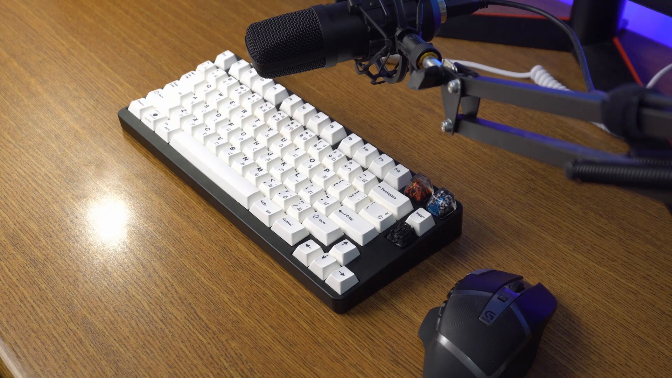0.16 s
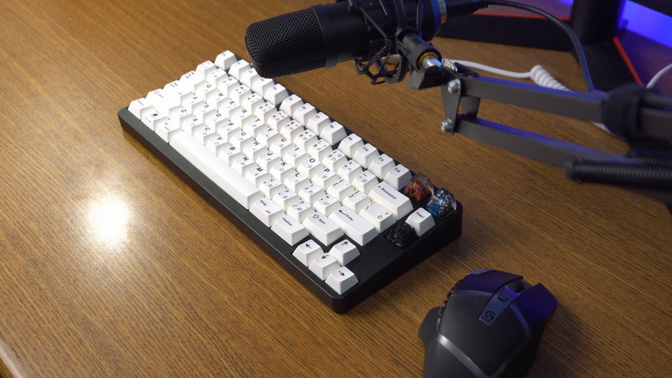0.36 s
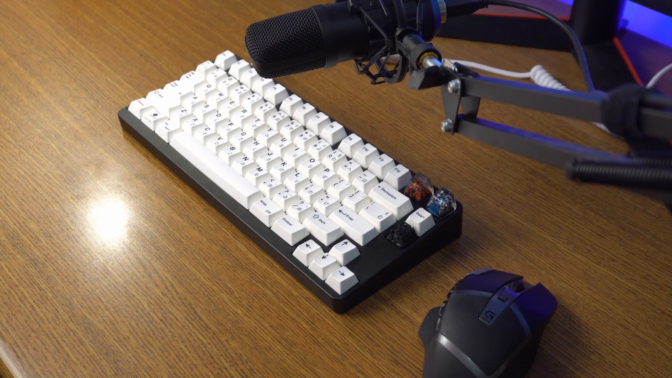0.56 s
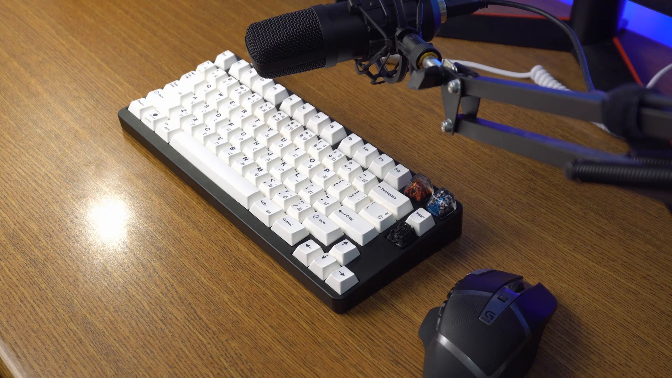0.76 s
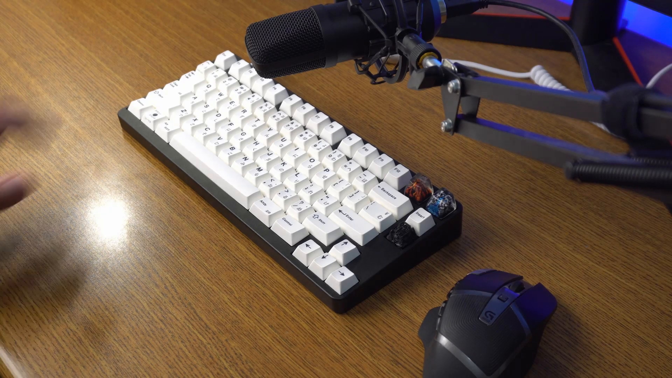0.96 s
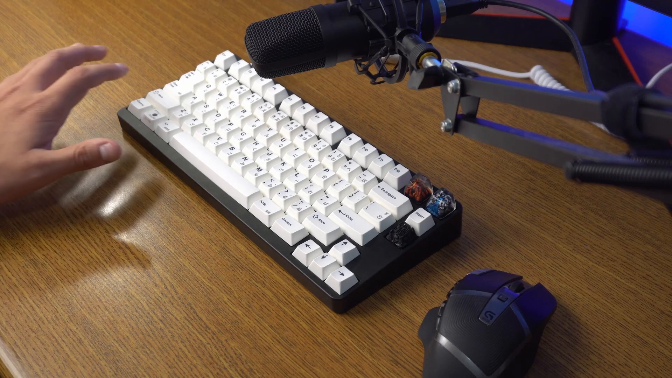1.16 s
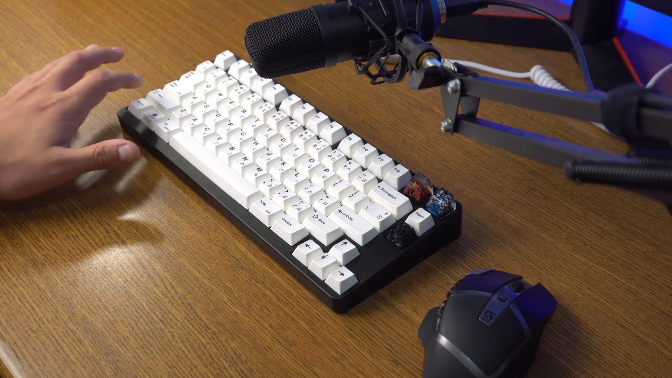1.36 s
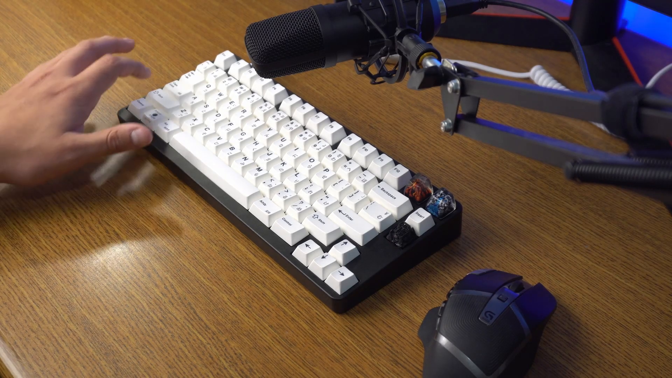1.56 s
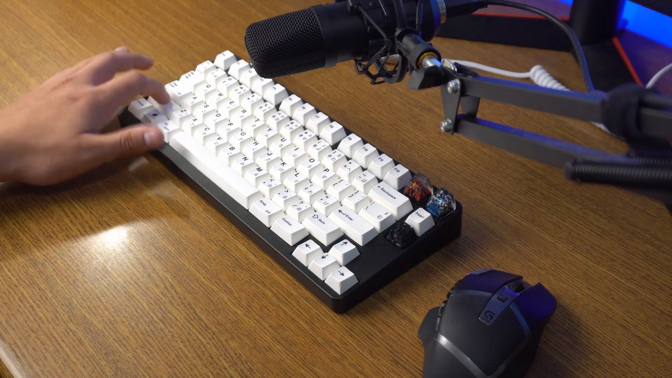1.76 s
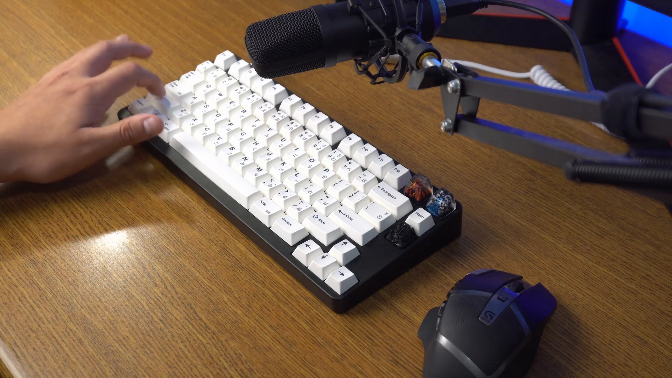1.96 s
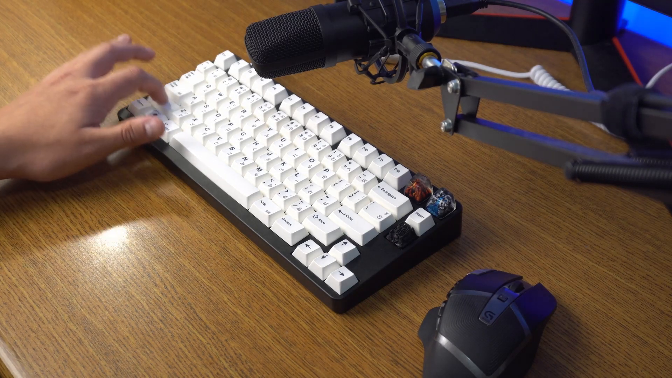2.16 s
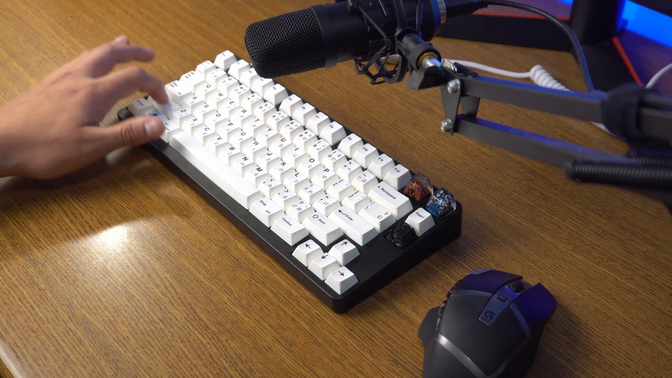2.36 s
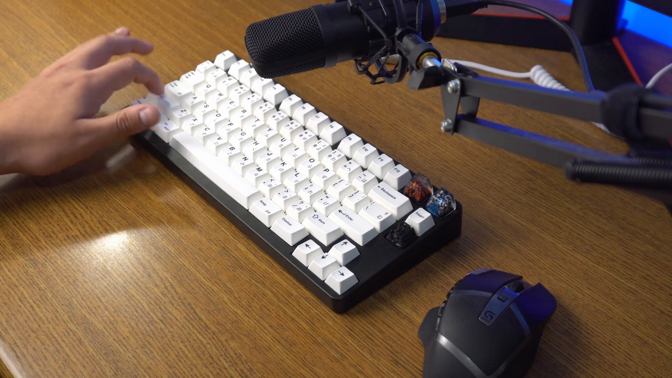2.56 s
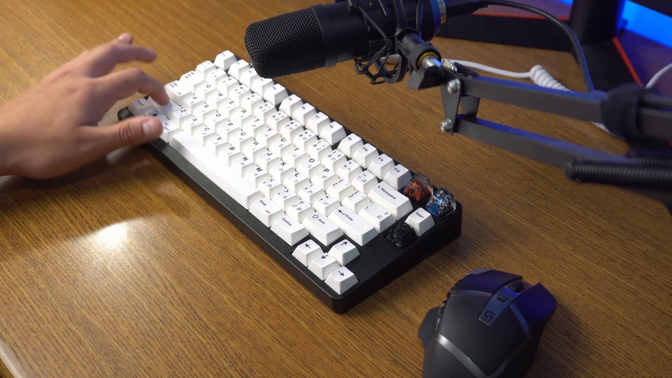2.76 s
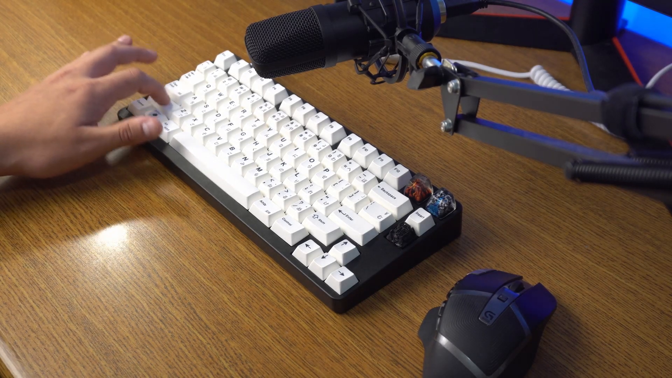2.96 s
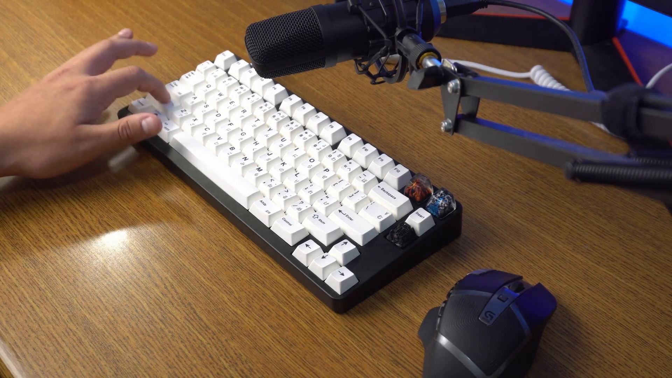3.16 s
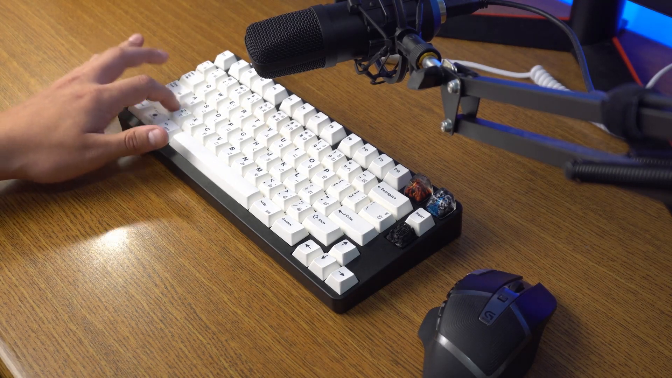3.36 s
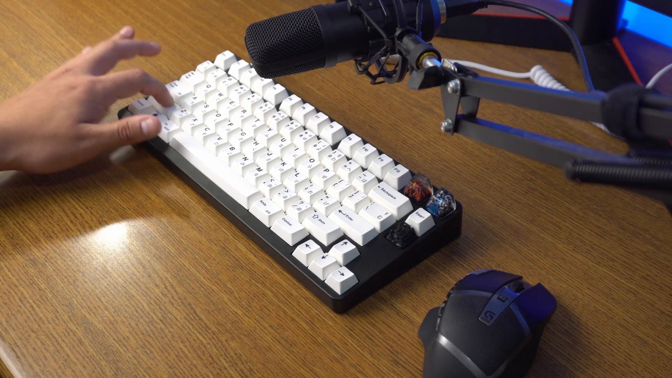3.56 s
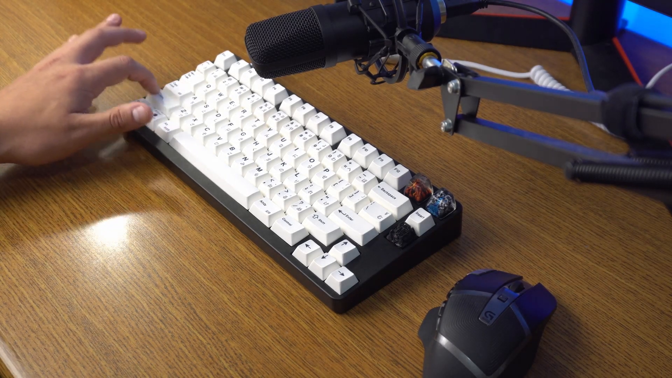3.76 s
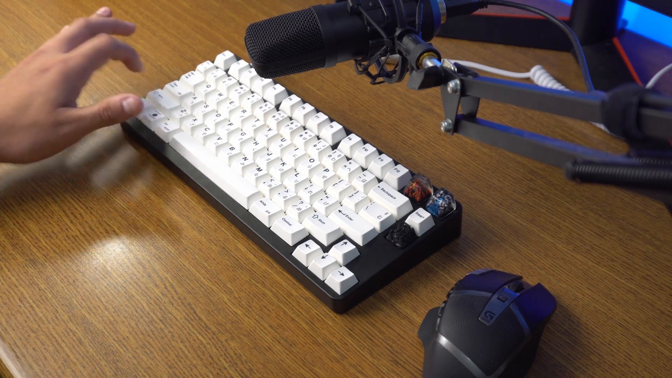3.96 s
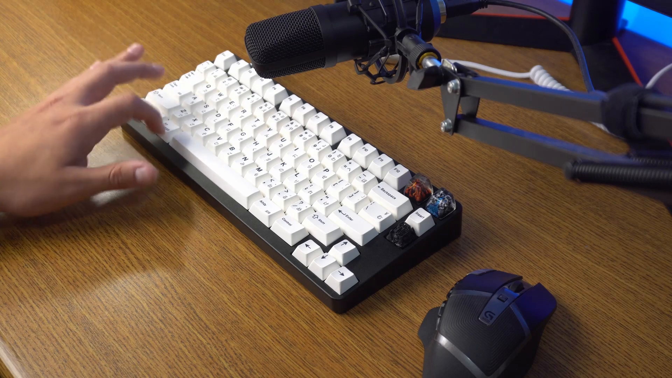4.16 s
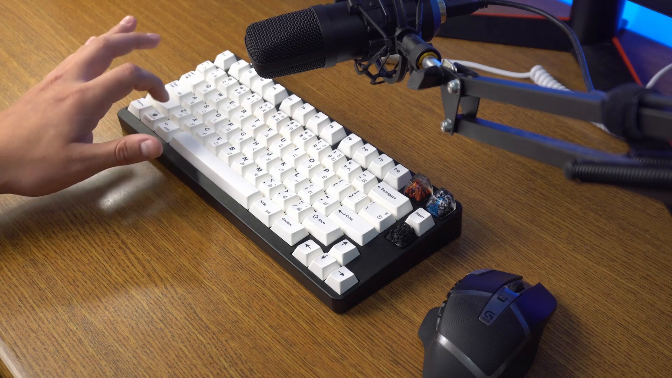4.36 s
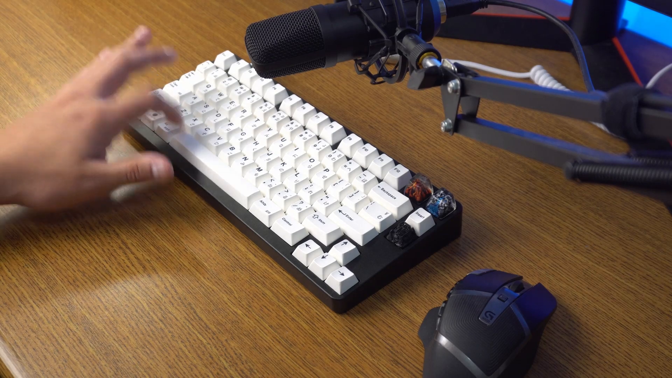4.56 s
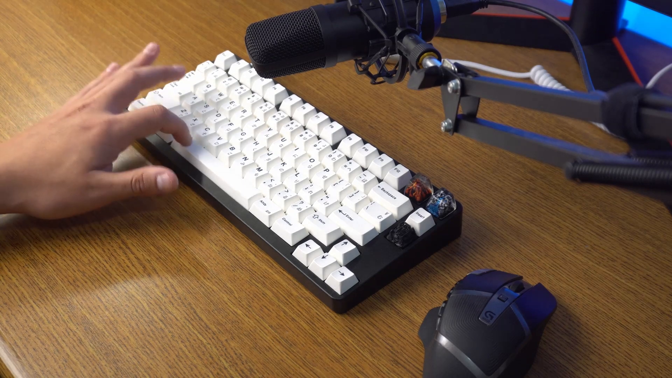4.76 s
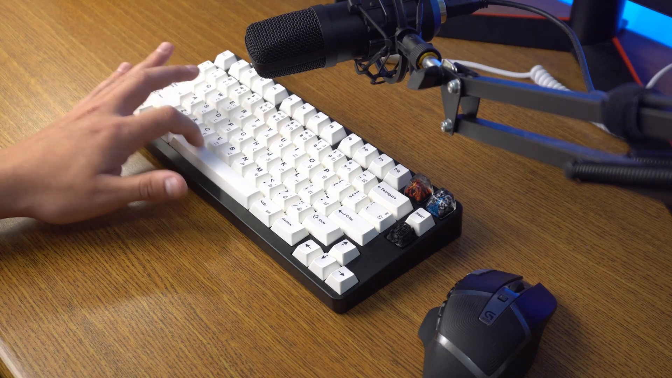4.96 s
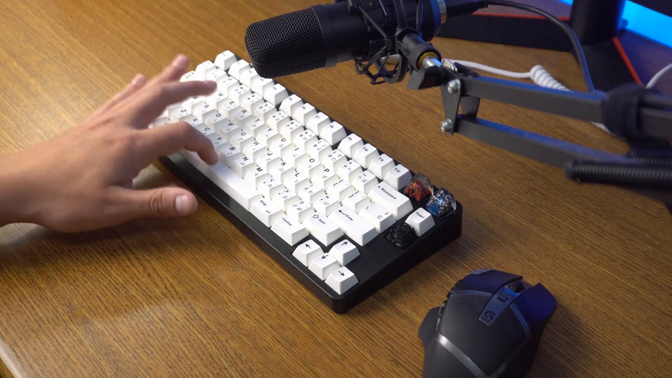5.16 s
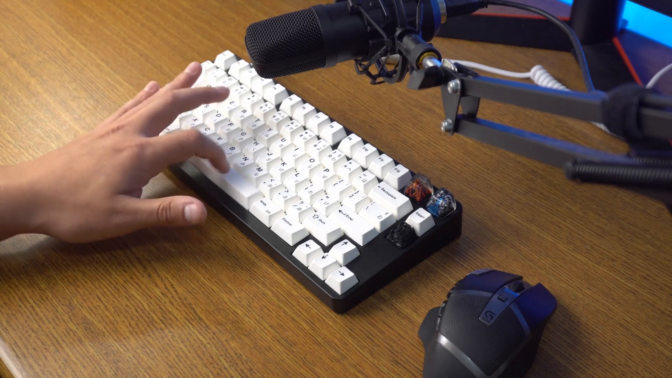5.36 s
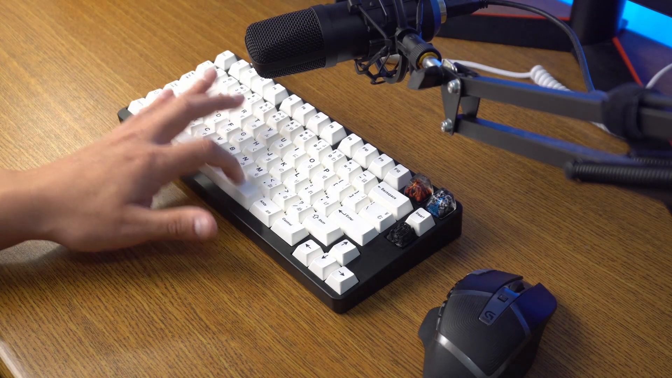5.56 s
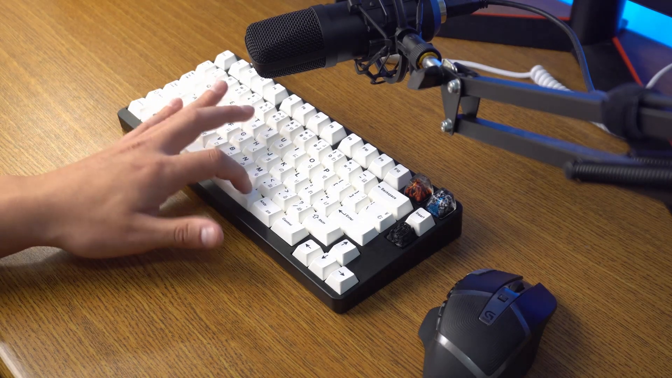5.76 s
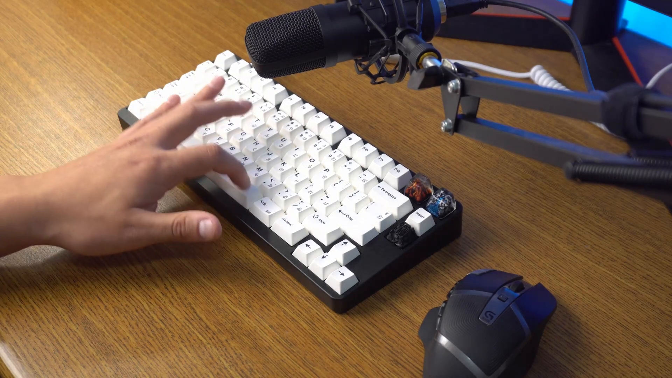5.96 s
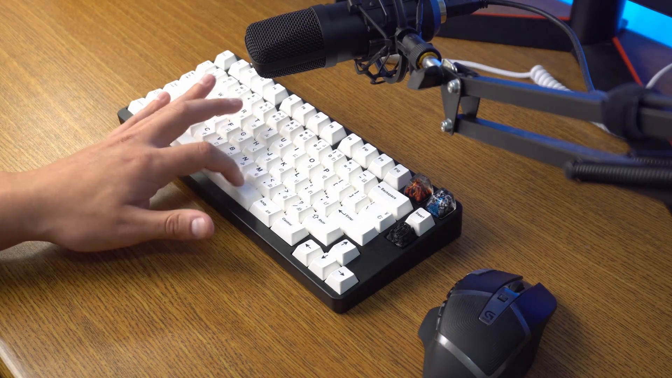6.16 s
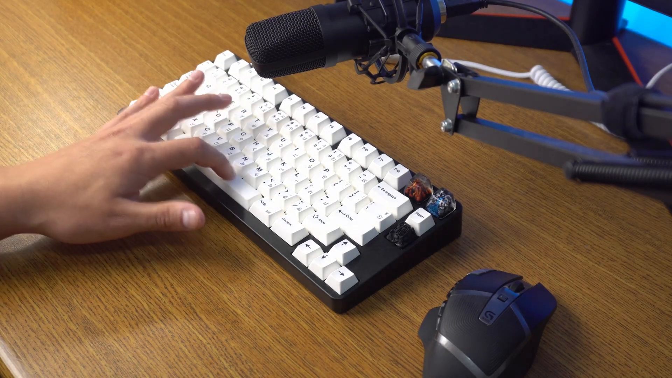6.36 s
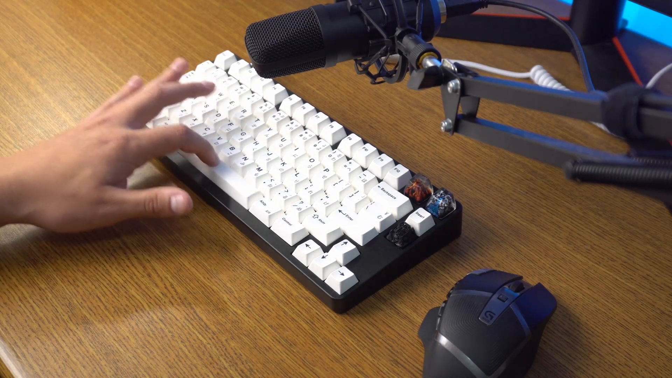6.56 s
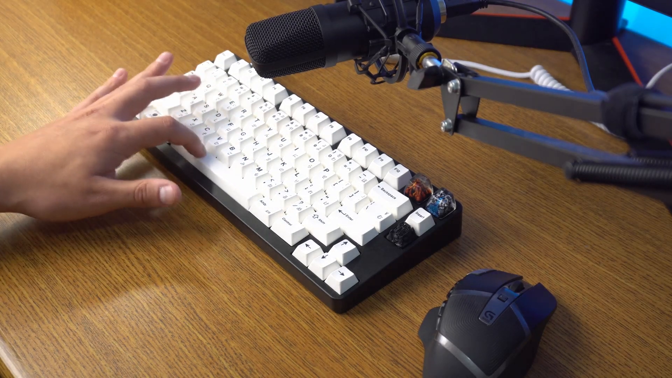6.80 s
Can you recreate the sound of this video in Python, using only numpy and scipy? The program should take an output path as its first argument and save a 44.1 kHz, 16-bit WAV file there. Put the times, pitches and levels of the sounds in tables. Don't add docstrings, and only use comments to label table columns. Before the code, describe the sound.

Close, crisp mechanical key presses in two even runs of fifteen, each clack followed by a softer release tick, over faint computer hum.

```python
import sys
import numpy as np
from scipy import signal
from scipy.fft import rfft, irfft, next_fast_len
from scipy.io import wavfile
from scipy.ndimage import uniform_filter1d

SR = 44100
rng = np.random.default_rng(int(sys.argv[2]) if len(sys.argv) > 2 else 0)


def boost_factor(decibels):
    exponent = np.asarray(decibels, float) / 20
    return 10 ** exponent


def generate_wav(signal):
    frames = np.transpose(np.atleast_2d(signal))
    scaled = np.clip(frames, -1, 1) * 32767
    pcm = np.round(scaled).astype(np.int16)
    wavfile.write(sys.argv[1], SR, pcm)


N = 301203
MOVE_S = 4.3

# t/s, cap peak level/dB,
# then stem knock, case ring, thock level/dB re cap
BOTTOM_OUTS = [(1.8042, -18.5, 0.5, -7.5, -15), (1.9544, -25.5, -3.5, -10.5, -29),
               (2.0952, -27.5, 2.5, -8.5, -34), (2.238, -25, -1, -6.5, -16), (2.385, -25, -1.5, -7, -29),
               (2.5351, -25, -1, -7.5, -15), (2.6927, -24, 0, -7.5, -21), (2.829, -25.5, -1, -2.5, -5),
               (2.9976, -24, 4, -8.5, -23), (3.1383, -29.5, 3.5, -0.5, -0.5),
               (3.2916, -32.5, 7.5, 2.5, -1), (3.4281, -24.5, 0.5, -8.5, -19), (3.5895, -23, 5, -10, -8),
               (3.7569, -25.5, -15, -14, -15.5), (3.8902, -24.5, -4, -24, -9.5),
               (4.663, -20.5, -1, -4, -10.5), (4.801, -24, -2, -2, -8.5), (4.9442, -22, 1, -6.5, -6.5),
                  (5.0846, -20.5, -4, -5.5, -10), (5.232, -15, 3.5, -18, -11.5),
                  (5.3769, -21.5, 0.5, -9, -7), (5.5192, -19.5, -10, -8, -9), (5.6747, -21, -11, -6, -10),
                  (5.8154, -21, -7, -5, -9), (5.9661, -21.5, -16, -5, -15.5),
                  (6.1129, -21.5, -7.5, -4, -11.5), (6.2594, -22.5, -11, -5, -10.5),
                  (6.4038, -24.5, -11, -4, -8), (6.5539, -23, -1, -6.5, -7.5), (6.6956, -26, 0.5, -5, -7)]
STRIKES = BOTTOM_OUTS


def evened(x):
    return x / np.sqrt(np.mean(x ** 2) + 1e-20)


def peaked(x):
    return x / (abs(x).max() + 1e-20)


def read(points, hz):
    f, value = np.transpose(points)
    return np.interp(np.log(hz + 1), np.log(f + 1), value)


def envelope(rows):
    t, db = np.transpose(rows)
    return boost_factor(np.interp(np.arange(N) / SR, t, db, -200, -200))


def add(mix, s, sound):
    part = mix[round(s * SR):][:len(sound)]
    part += sound[:len(part)]


def noise(tone):
    size = next_fast_len(N)
    hz = np.fft.rfftfreq(size, 1 / SR)
    spectrum = rfft(rng.standard_normal(size)) * boost_factor(read(tone, hz))
    return evened(irfft(spectrum, size)[:N])


def resonate(x, hz, width_hz):
    return signal.lfilter(*signal.iirpeak(hz, hz / width_hz, SR), x)


def ring(modes, t, spread, spread_db, rise_s):
    hz, db, t60 = np.transpose(modes)[:, :, None]
    level_luck, pitch_luck = rng.standard_normal((2, len(modes), 1))
    decay = boost_factor(db + spread_db * level_luck - 60 * t / t60)
    lines = decay * np.sin(2 * np.pi * hz * (1 + spread * pitch_luck) * t)
    return lines.sum(0) * (1 - np.exp(-t / rise_s)) ** 2


def fan_air():
    # f/Hz, level/dB
    air_tone = [(15, -0.5), (24, 9), (40, -29.5), (62, -2.5), (100, -17), (170, -18.5), (260, -19),
                (450, -22), (800, -31), (1500, -36.5), (2600, -41), (6000, -45), (15300, -45.5),
                (16000, -62)]
    swell = evened(uniform_filter1d(rng.standard_normal(N), 9000))
    return boost_factor(-57 + 0.4 * swell) * noise(air_tone)


def mains_hum():
    # f/Hz, rms level/dB
    harmonics = [(60.2, -66.5), (120.4, -66), (240.5, -74)]
    turn = 2 * np.pi * np.arange(N) / SR
    hum = np.zeros(N)
    for hz, db in harmonics:
        halo = evened(resonate(rng.standard_normal(N), hz, 6.5))
        hum += boost_factor(db) * (1.2 * np.sin(hz * turn) + 0.45 * halo)
    return hum


def soft_noises():
    # t/s, level/dB
    distant_swell = [
        (5.9, -66),
        (5.972, -49),
        (6.08, -61.5),
    ]
    # t/s, level/dB
    rustles = [
        [(0.0, -52.5), (0.004, -74), (0.05, -82)],
        [(0.68, -101), (0.736, -73), (0.95, -90)],
    ]
    dull = noise([(150, -22), (300, -13.5), (800, -15.5), (1500, -21.5), (4000, -56)])
    bright = noise([(800, 14), (2500, -15), (7000, -11), (12000, -12), (16000, -25)])
    return dull * envelope(distant_swell) + bright * sum(envelope(rows) for rows in rustles)


def activity(axis, rise_s, fade_s, landing_db, settle_s):
    # start t/s, end t/s, then rubbing, slow sway, quick sway level/dB
    runs = [
        (1.827, 4.0, -62.5, -48, -56),
        (4.67, 6.9, -62.5, -49, -57),
    ]
    t, out = np.arange(N) / SR, np.zeros(N)
    for run in runs:
        before = np.maximum(run[0] - t, 0)
        after = np.maximum(t - run[1], 0)
        edges_db = -20 * (before / rise_s + after / fade_s)
        overshoot_db = landing_db * np.exp(-np.maximum(t - run[0], 0) / settle_s)
        out += boost_factor(run[axis] + edges_db + overshoot_db)
    return out


def sway():
    slow = evened(resonate(resonate(rng.standard_normal(N), 22.6, 16), 22.6, 16))
    quick = evened(resonate(resonate(rng.standard_normal(N), 64, 30), 64, 30))
    kick_db, kick_s = 12, 0.03
    u, jolts = np.arange(SR // 4) / SR / kick_s, np.zeros(N)
    for s, *_ in STRIKES:
        add(jolts, s, u * np.exp(1 - u) * rng.uniform(0.55, 1))
    quick = resonate(quick, 66, 60.5) * boost_factor(kick_db * (jolts - 0.5))
    shape = dict(rise_s=0.064, fade_s=1, landing_db=7, settle_s=0.22)
    return slow * activity(3, **shape) + quick * activity(4, **shape)


def held():
    # f/Hz, level/dB
    fizz_tone = [(800, 0.5), (2000, 0.5), (4500, -4.5), (8000, -7), (13000, -12.5), (15700, -13.5),
                 (16000, -51)]
    hold_s = 0.072
    t, gain = np.arange(SR // 5) / SR, np.zeros(N)
    for s, db, *_ in STRIKES:
        add(gain, s, boost_factor(db - 40.5 - 6.7 * (t / hold_s) ** 2))
    return gain * noise(fizz_tone)


def rub():
    # f/Hz, level/dB
    rub_tone = [(700, -1.5), (1300, 0.5), (2000, -0.5), (3000, 1.5), (5000, -7), (9000, -14.5),
                (15600, -22), (16000, -46.5)]
    usual_db = (-22.5, -21)
    grain = boost_factor(1.4 * evened(uniform_filter1d(rng.standard_normal(N), 120)))
    s, db = np.transpose(STRIKES)[:2]
    excess_db = db - np.where(s > MOVE_S, usual_db[1], usual_db[0])
    force_db = np.interp(np.arange(N) / SR, s + 0.085, excess_db)
    gain = activity(2, rise_s=0.018, fade_s=0.15, landing_db=1, settle_s=0.15)
    return evened(noise(rub_tone) * grain) * gain * boost_factor(-3.5 + 0.54 * force_db)


def desk_shake(pushes):
    # f/Hz, level/dB, t60/s
    desk_modes = [(64.7, 7, 0.12), (25.2, -13.5, .2), (90.4, 3, .07), (150.4, -5, 0.013),
                  (216, 10.5, 0.039)]
    shake = ring(desk_modes, np.arange(SR // 3) / SR, spread=0, spread_db=0, rise_s=0.0018)
    return signal.oaconvolve(pushes, shake)[:N]


def room(x):
    # f/Hz, t60/s
    decay = [(300, 0.61), (1000, 0.22), (2000, 0.25), (4000, 0.24), (8000, 0.17), (15000, 0.21)]
    # f/Hz, level/dB
    tail_tone = [(300, -16), (800, -17), (1500, -12.5), (3000, -17.5), (6000, -11.5), (15300, -20.5),
                 (16200, -45.5)]
    out, turn = np.zeros(N), np.arange(N) / SR * 8.3
    for k in range(3):
        taps = np.zeros(SR // 3)
        at = np.arange(60, len(taps) - 20, 20)
        taps[at + rng.integers(0, 20, len(at))] = rng.choice([-1., 1.], len(at))
        hz, t, z = signal.stft(taps, SR, nperseg=128)
        late = boost_factor(-60 * t / np.maximum(read(decay, hz), 0.01)[:, None])
        scatter = boost_factor(7.5 - 60 * t / 0.032)
        shaped = z * boost_factor(read(tail_tone, hz))[:, None] * (late + scatter)
        tail = 0.13 * signal.istft(shaped, SR, nperseg=128)[1]
        share = np.cos(turn + k * np.pi / 3) * np.sqrt(2 / 3)
        out += signal.oaconvolve(x * share, tail)[:N]
    return out


def radiate(x):
    x = signal.sosfilt(signal.butter(4, 365, "hp", fs=SR, output="sos"), x)
    return x - 0.64 * resonate(x, 906, 290)


def crackle(x, top_db):
    # f/Hz, width f/Hz, level/dB
    humps = [(4410, 980, 5), (5210, 400, -8), (7200, 1800, -6.5), (9590, 3400, -4.5), (14100, 2700, 3.5)]
    x = resonate(resonate(x, 5260, 9360), 4950, 6000)
    for hz, width_hz, db in humps:
        dull_db = top_db * (hz > 9e3)
        x = x + boost_factor(db + dull_db + 0.89 * rng.standard_normal()) * resonate(x, hz, width_hz)
    return x


def contact(row, kind):
    # f/Hz, level/dB, t60/s
    cap_modes = [(2727, 2, 0.0092), (3058, -9.5, 0.024), (2430, -0.5, 0.0055), (3480, -20, 0.05)]
    stem_modes = [(1955, 1, 0.016), (2173, -1, 0.014), (1680, -17, 0.035)]
    case_modes = [
        [(1269, 12, 0.013), (1098, 1, 0.021), (1486, -21, 0.023)],
        [(1315, 4.5, 0.011), (1086, -7, 0.015), (1500, -68, 0.084)],
    ]
    thock_modes = [
        [(440, -0.5, 0.02), (530.4, -3.5, 0.026), (745, 0, 0.017)],
        [(436.5, -5.5, 0.028), (503, -5.5, 0.03), (678, -5.5, 0.019)],
    ]
    part_db = (3, -0.23, 0, -4, 0.63)
    s, cap_db, *rel_db = row
    db, fall_ms, rattle_db, rise_ms, shake_db, top_db = kind
    zone = int(s > MOVE_S)
    t = np.arange(1400) / SR
    bounces = rng.standard_normal(len(t)) * boost_factor(1.15 * rng.standard_normal(len(t)))
    rattle = bounces * boost_factor(-2e4 * t / fall_ms) * (1 - np.exp(-1e3 * t / rise_ms))
    rattle /= np.linalg.norm(rattle)
    drive = boost_factor(rattle_db) * rattle + (t == 0)
    sizzle = drive + 0.6 * rattle
    rings = [
        ring(cap_modes, t, 0.02, 1.7, rise_s=3e-5),
        ring(stem_modes, t, 0.02, 1.7, rise_s=3e-5),
        ring(case_modes[zone], t, 0.008, 1.3, rise_s=0.0075),
        ring(thock_modes[zone], t, 0.015, 1.5, rise_s=0.0022),
    ]
    rung = signal.fftconvolve(drive[None], rings, axes=1)[:, :len(t)]
    parts = [*rung, crackle(sizzle, top_db)]
    gains = boost_factor(cap_db + db + np.array([0, *rel_db]) + part_db)
    return -sum(g * peaked(p) for g, p in zip(gains, parts)), boost_factor(cap_db + shake_db)


def strikes():
    # level/dB, rattle 20 dB fall t/ms, rattle level/dB re click, rise t/ms,
    # desk shake level/dB, crack top level/dB
    kinds = [
        (1, 2.5, 1, 0.11, -28.5, -7),
        (1, 3.5, -3, 0.04, -30.5, 4),
    ]
    # level/dB, slope in dB per dB of stem
    cracks = [
        (2.5, 0.24),
        (0.75, 0.07),
    ]
    for s, db, stem_db, case_db, thock_db in STRIKES:
        crack_db, slope = cracks[s > MOVE_S]
        yield (s, db, stem_db, case_db, thock_db, crack_db + slope * stem_db), kinds[s > MOVE_S]


def touches():
    # t/s, cap peak level/dB, crack level/dB
    nail_touches = [(1.7978, -37.5, 12.5), (1.9352, -43, 11), (2.0759, -40.5, 7.5), (2.2199, -40.5, 6.5),
                    (2.3658, -41, 7), (2.5163, -40, 7.5), (2.678, -42, 9.5), (2.8056, -46.5, 2),
                    (2.9779, -43.5, 9.5), (3.1167, -44, 7.5), (3.2606, -48, 7), (3.4022, -45, 11),
                    (3.5684, -44, 8), (3.7298, -42, 2.5), (3.8692, -42.5, 2), (4.653, -32, 6.5),
                    (4.78, -57, 4), (4.9286, -43, 4), (5.0657, -42.5, 0), (5.2186, -44, 6.5),
                    (5.3586, -43, 4), (5.506, -49, -1), (5.6552, -47, -4), (5.797, -44, 0.5),
                    (5.941, -46.5, 3), (6.086, -50.5, 4), (6.2273, -56, 2), (6.3846, -54, -9),
                    (6.527, -51, -3), (6.6626, -51.5, 4)]
    kind = (-0.5, 7, 6.5, 0.3, -28, -7)
    # stem knock, case ring, thock level/dB
    colours = [
        (-4, -8.5, -24.5),
        (-9, -6, -21),
    ]
    for s, db, crack_db in nail_touches:
        yield (s, db, *colours[s > MOVE_S], crack_db), kind


def slips():
    # t/s, cap peak level/dB, crack
    # level/dB
    stem_slips = [(1.2563, -61, 8), (1.8578, -47.5, 8.5), (1.9967, -43.5, -4), (2.004, -48, 6),
                  (2.138, -48, 3), (2.1484, -46, 5), (2.292, -43.5, 2), (2.301, -46, 5), (2.438, -45.5, 1),
                  (2.4473, -44, 4.5), (2.5936, -43, 1), (2.7433, -41, 2.5), (2.8892, -43.5, 2.5),
                  (2.902, -49, 8), (3.0527, -42, 1.5), (3.1989, -44.5, 2), (3.269, -52, 5),
                  (3.3406, -40, 7), (3.484, -50, 6.5), (3.6556, -44.5, 5), (3.8073, -55, 6.5),
                  (3.8227, -54, 2), (3.944, -45.5, -3), (3.9497, -50, 7),
                  (4.7093, -49, 4.5), (4.8454, -54, 1), (4.853, -48, -14), (4.9917, -47, -1),
                    (5.129, -54, -7), (5.2694, -48, 7), (5.4297, -44, 1), (5.497, -55, -8),
                    (5.573, -39.5, 0), (5.725, -39, 0.5), (5.736, -40.5, 0.5), (5.8707, -39.5, 3),
                    (6.019, -42.5, 2), (6.1698, -41, -0.5), (6.3413, -48.5, -8), (6.4614, -38.5, -1),
                    (6.523, -62, 5), (6.7623, -49, 1)]
    kind = (0.5, 5.5, 5, 0.1, -26, -13.5)
    # stem knock, case ring, thock level/dB
    colours = [
        (-9, -14.5, -29),
        (-2.5, -5, -18),
    ]
    for s, db, crack_db in stem_slips:
        yield (s, db, *colours[s > MOVE_S], crack_db), kind


def top_outs():
    # t/s, cap peak level/dB, thock level/dB, crack level/dB
    returns = [(1.871, -41, 2.5, 0), (2.0164, -52, 7, 2), (2.1603, -43, 2.5, .5), (2.3147, -46, 4.5, 0.5),
               (2.4605, -46.5, 7, -2), (2.6087, -40, 1, 3), (2.7585, -49, -29, 8), (2.915, -50, 6, -1),
               (3.0663, -48.5, 6, -2), (3.2194, -52, 8, -3), (3.3577, -44.5, 7.5, 3),
               (3.5029, -43.5, 6.5, 2.5), (3.6654, -44, 6, -3), (3.834, -58.5, 8, -8),
               (3.961, -39, 5.5, 8.5), (4.7243, -39.5, -11, -4), (4.861, -37.5, -10, 1.5),
               (5.0048, -35.5, -5.5, 1), (5.145, -31.5, -12, 0.5), (5.289, -34, -11, 10),
               (5.4433, -31, -20, -5.5), (5.5847, -31.5, -12, -5), (5.7392, -37, -7.5, 1.5),
               (5.885, -32.5, -9.5, -3), (6.0364, -36.5, -7, -4.5), (6.1869, -36.5, -13, -9),
               (6.3172, -42.5, -11, -1.5), (6.4776, -37, -20, -6.5), (6.6251, -49.5, -14, 2.5),
               (6.7777, -35.5, -15, -4)]
    kind = (1.5, 6, 3, 0.1, -20.5, -11.5)
    # stem knock level/dB, case ring level/dB, case slope in dB per dB of thock
    colours = [
        (-2.5, -2.9, 0.56),
        (-11, 5.5, 0.93),
    ]
    for s, db, thock_db, crack_db in returns:
        stem_db, case_db, slope = colours[s > MOVE_S]
        yield (s, db, stem_db, case_db + slope * thock_db, thock_db, crack_db), kind


def keyboard():
    air, pushes = np.zeros((2, N))
    for contacts in (strikes(), touches(), top_outs(), slips()):
        for row, kind in contacts:
            sound, push = contact(row, kind)
            add(air, row[0], sound)
            pushes[round(row[0] * SR)] += push
    return radiate(air), pushes


def scene():
    keys, pushes = keyboard()
    wet = boost_factor(2.5 * (np.arange(N) < MOVE_S * SR))
    typing = keys + room(keys * wet) + desk_shake(pushes) + rub() + held()
    return (typing + sway() + soft_noises() + fan_air() + mains_hum())[None]


def low_pass(x):
    return signal.sosfilt(signal.butter(12, 16920, fs=SR, output="sos"), x)


def record(dry):
    edge = signal.firwin(301, 16700, window=("kaiser", 9), fs=SR)
    mix = signal.oaconvolve(dry, edge[None], "same")
    return low_pass(mix)


dry = scene()
out = record(dry)
generate_wav(out)
```